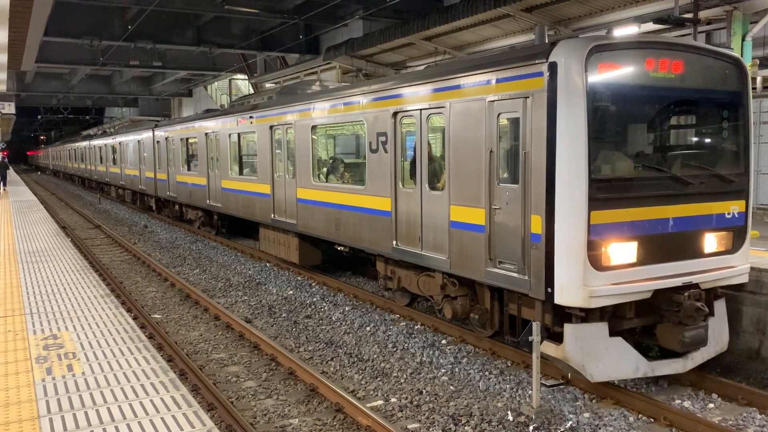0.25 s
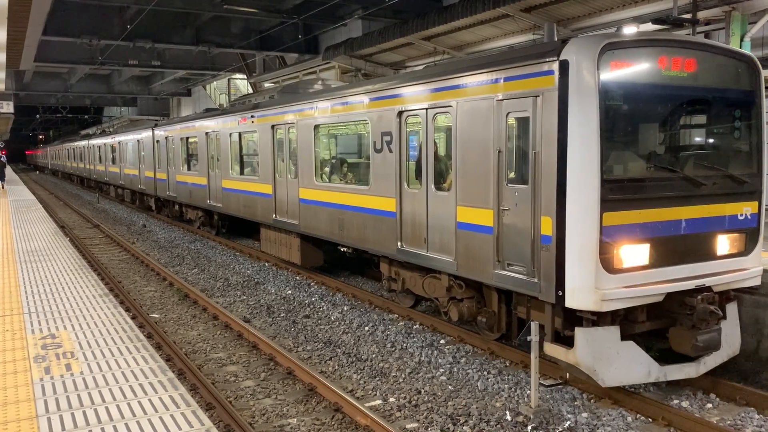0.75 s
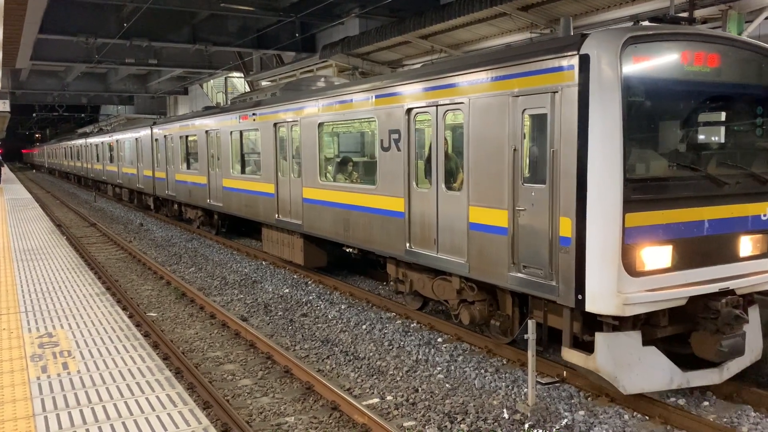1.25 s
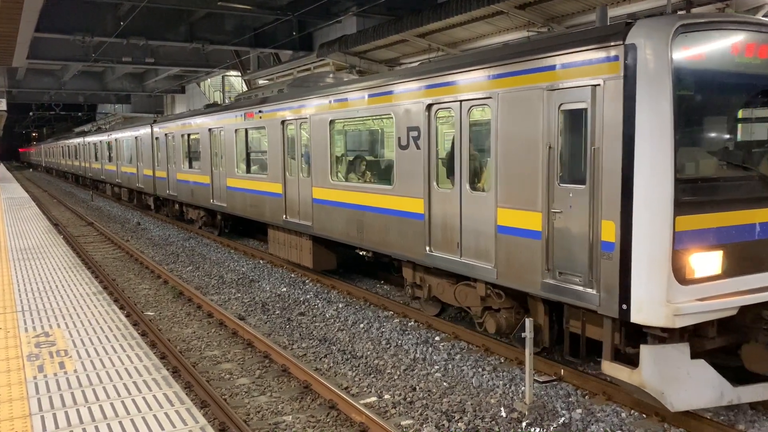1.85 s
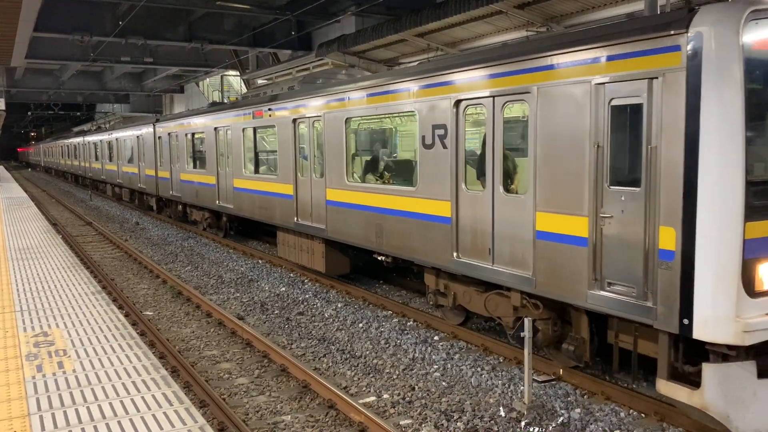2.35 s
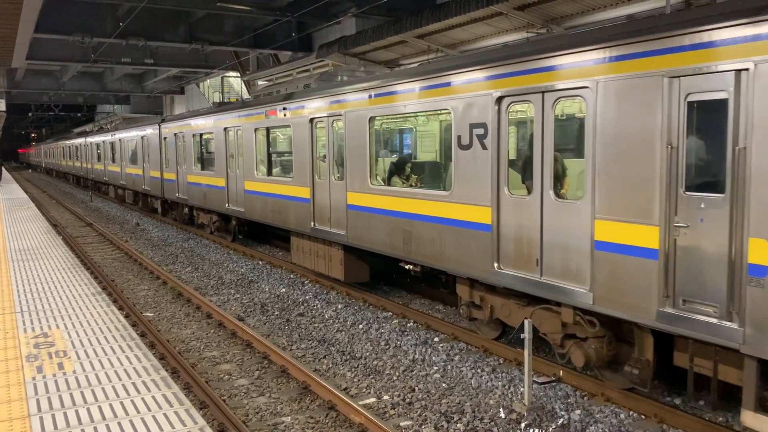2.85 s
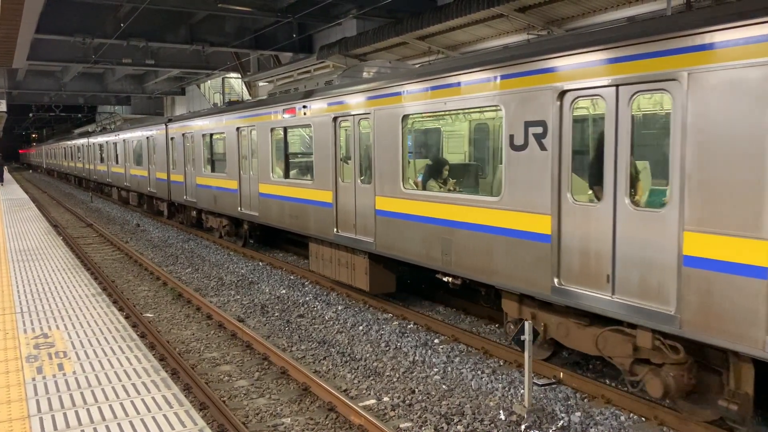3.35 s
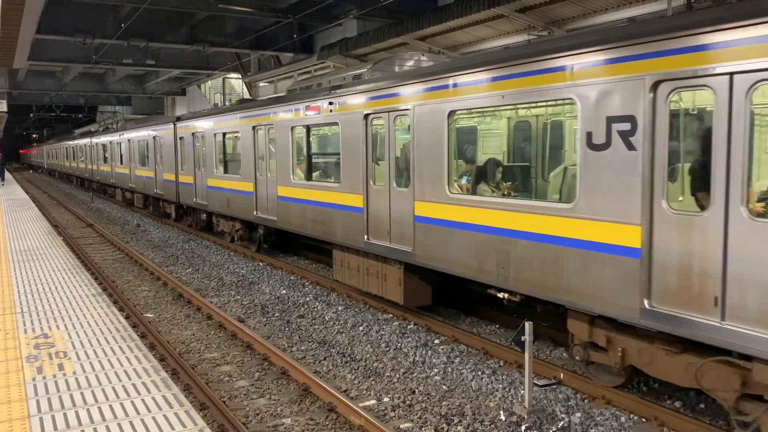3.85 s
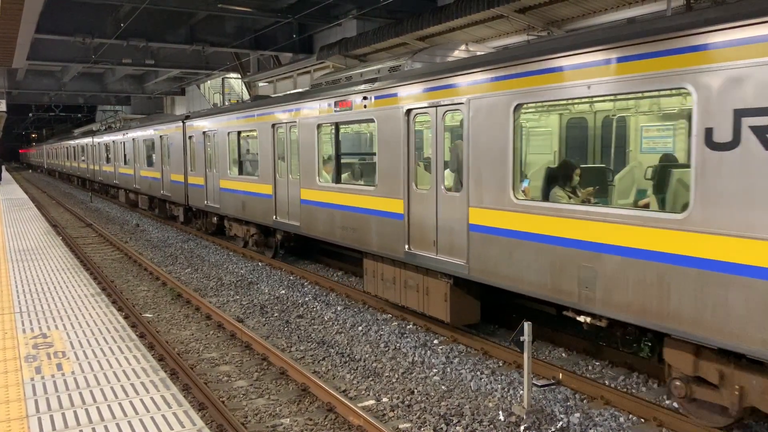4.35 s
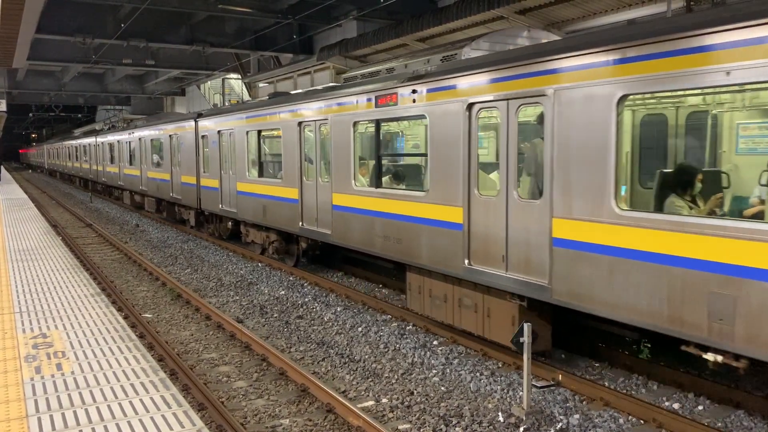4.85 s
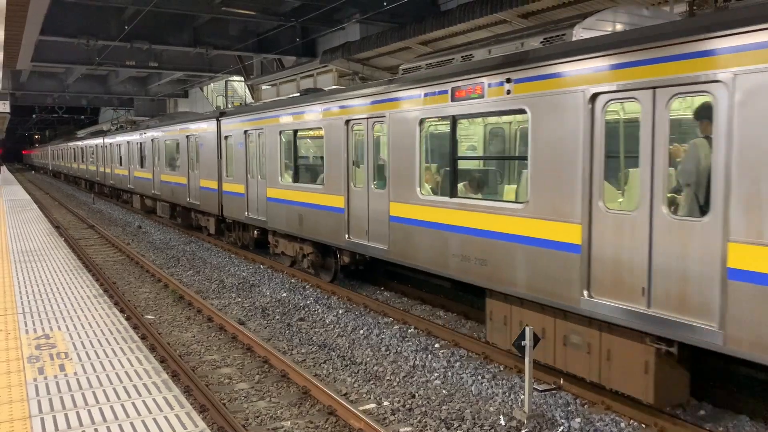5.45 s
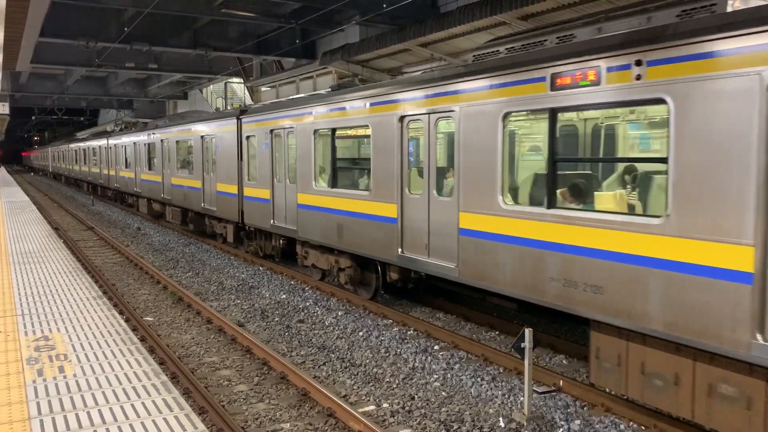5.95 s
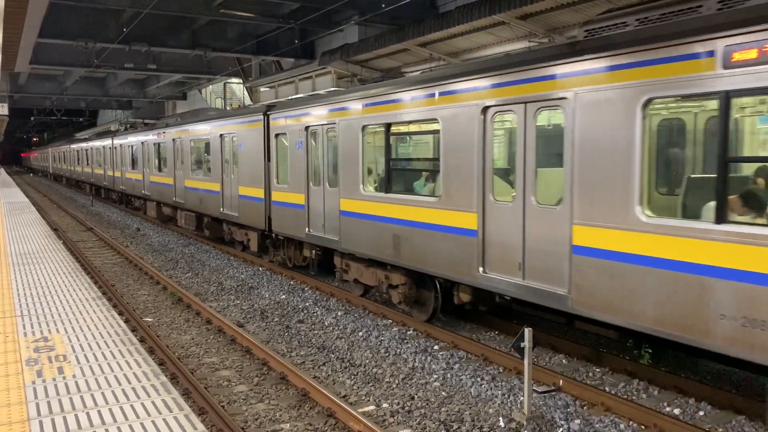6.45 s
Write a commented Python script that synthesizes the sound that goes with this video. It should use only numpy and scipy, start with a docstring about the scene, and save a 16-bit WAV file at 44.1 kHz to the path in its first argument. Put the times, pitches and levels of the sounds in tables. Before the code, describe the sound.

An electric train rolls out of a roofed station, humming and hissing with a wavering whistle that sags away, then rumbling, growling and clanking over rail joints.

```python
"""An electric commuter train pulls out, heard across the tracks by a phone on a roofed platform.
Wheels and rail ring as noise-driven resonances and clank at the joints as struck modes.
A valve hisses as flickering coloured noise, and whistles as a beating tone, then a sagging note.
Hum tones, a blower and a climbing motor growl sound under the floor; banded noise rumbles.
Each port adds echoes of its own."""
import sys
import numpy as np
from scipy import signal
from scipy.fft import rfft, irfft, next_fast_len
from scipy.io import wavfile
from scipy.ndimage import uniform_filter1d, map_coordinates

SR = 44100
rng = np.random.default_rng(int(sys.argv[2]) if len(sys.argv) > 2 else 0)


def digitize_waveform(pressure):
    """Quantize a signal to 16-bit integers and store it at the path in sys.argv[1].

    Rows of a 2-D input are taken as channels; values are limited to [-1, 1].
    """
    field = np.atleast_2d(pressure).T
    bounded = np.clip(field, -1, 1)
    quanta = np.round(bounded * 32767).astype(np.int16)
    wavfile.write(sys.argv[1], SR, quanta)


N = 295905
TIME_S = np.arange(N) / SR
SIZE = next_fast_len(N + 2 * SR, real=True)  # transform length, with room for echoes
AIR_FADE_DB_PER_S = 77  # hiss and steady whistle both die at this rate


def undb(db):
    """Turn decibels into gain."""
    return 10 ** (np.asarray(db) / 20)


def unit(x):
    """Scale to rms 1."""
    return x / np.sqrt(np.mean(x ** 2))


def curves(table):
    """Join table columns by straight lines over the time in the first column."""
    time_s, *columns = np.transpose(table)
    return [np.interp(TIME_S, time_s, column) for column in columns]


def walk(rate_hz):
    """Wander at random: levels held for 1 / rate, smoothed twice, rms 1."""
    hold = int(SR / rate_hz)
    steps = np.repeat(rng.standard_normal(N // hold + 1), hold)
    return unit(uniform_filter1d(uniform_filter1d(steps, hold), hold)[:N])


def swell_db(peak_s, peak_db, lasts_s):
    """Rise and fall once, 10 dB down at lasts_s either side of the peak."""
    return peak_db - 10 * ((TIME_S - peak_s) / lasts_s) ** 2


def tone(pitch_hz, level_db):
    """A sine that follows a pitch and an rms level, from a random starting phase."""
    phase = 2 * np.pi * np.cumsum(pitch_hz) / SR + rng.uniform(0, 2 * np.pi)
    return np.sqrt(2) * undb(level_db) * np.sin(phase)


def ring(x, pitch_hz, width_hz):
    """Two-pole resonance with gain 1 at its centre."""
    b, a = signal.iirpeak(min(pitch_hz, .45 * SR), pitch_hz / width_hz, fs=SR)
    return signal.lfilter(b, a, x)


def rough_ring(pitch_hz, width_hz):
    """Flickering noise through a steep resonance that strays in pitch, rms 1."""
    flicker_db = 2.97 * walk(14) + .7 * walk(2.41)
    rough = rng.standard_normal(N) * undb(flicker_db)
    pole_width_hz = 1.23 * width_hz  # two passes narrow the band
    steady = ring(ring(rough, pitch_hz, pole_width_hz), pitch_hz, pole_width_hz)
    stray = .004 * walk(20)  # share of the pitch
    read_at = np.arange(N) + np.cumsum(stray - stray.mean())
    return unit(map_coordinates(steady, [read_at], mode="mirror"))


def bands(colour, flicker_db, rate_hz):
    """Coloured noise as octave bands (centre Hz, sound), each flickering alone."""
    f = np.maximum(np.fft.rfftfreq(SIZE, 1 / SR), 1)
    pitch_hz, level_db = np.transpose(colour)
    shape_db = np.interp(np.log(f), np.log(pitch_hz), level_db, left=-90)
    noise = rfft(rng.standard_normal(SIZE)) * undb(shape_db)
    noise = noise / np.sqrt(np.mean(irfft(noise, SIZE) ** 2))
    out = []
    for centre_hz in 2. ** np.arange(4, 15):
        if centre_hz >= pitch_hz[0] / 2:
            overlap = np.clip(1 - abs(np.log2(f / centre_hz)), 0, 1)
            band = irfft(noise * overlap, SIZE)[:N]
            out.append((centre_hz, band * undb(flicker_db * walk(rate_hz))))
    return out


def rumble():
    """Broad noise of station, fans and car bodies; four ranges follow their own levels."""
    # course of the rumble: start_s [s], bass_db, deep_db, treble_db, top_db [dB]
    rumble_levels = [(0, -37, -35, -31.5, -31), (2.84, -36, -31.5, -31, -32), (3.6, -37, -33.5, -33, -35),
                     (4.4, -36, -27, -33.5, -33), (5.75, -34, -31, -31.5, -31.5),
                     (6.71, -33, -31.5, -29.5, -29.5)]
    # relative colour: pitch_hz [Hz], level_db [dB]
    rumble_colour = [(22, -38), (32, -27), (55, -3.5), (90, -4), (150, -5.5), (300, -9.5), (550, -18),
                     (1100, -24.5), (1900, -30.5), (2600, -34), (4500, -36), (6500, -42.5), (11000, -43),
                     (16000, -57.5)]
    bass_db, deep_db, treble_db, top_db = curves(rumble_levels)
    lumps_db = .2 * TIME_S  # the low end grows lumpier with speed
    bass_db = bass_db + lumps_db * walk(10)
    deep_db = deep_db + lumps_db * walk(10)
    out = np.zeros(N)
    for centre_hz, band in bands(rumble_colour, flicker_db=2.18, rate_hz=6.5):
        if centre_hz < 100:
            level_db = deep_db
        elif centre_hz < 700:
            level_db = bass_db
        else:
            level_db = treble_db if centre_hz < 6000 else top_db
        out += band * undb(level_db)
    return out


def blower():
    """A blower hisses in close resonant bands at constant mean level."""
    # blower bands: pitch_hz [Hz], width_hz [Hz], level_db [dB]
    fan_rings = [(4994, 59, -58.5), (5160, 77, -58.5), (5304, 106, -56)]
    return sum(undb(level_db) * rough_ring(pitch_hz, width_hz)
               for pitch_hz, width_hz, level_db in fan_rings)


def underfloor_hum():
    """A clean main hum over weaker tones of narrow resonant noise, and one low rough swell."""
    # main hum: start_s [s], level_db [dB]
    hum_levels = [(0, -35), (1.58, -35), (1.7, -48), (2.1, -44), (2.58, -35), (2.72, -42), (3.1, -54),
                  (3.8, -41), (4.55, -41), (4.8, -34.5), (5.05, -39), (5.22, -64), (5.6, -32), (6.2, -40),
                  (6.71, -42)]
    # weaker tones: pitch_hz [Hz], width_hz [Hz], level_db at the start [dB], drift [dB per s]
    hum_tones = [(53.8, 2.1, -47, -0.0073), (173, 9.1, -48, 0.075), (236.5, 4.6, -46, -0.85),
                 (292.9, 10, -47.5, -0.074), (355.2, 5.6, -51.5, -0.29), (407.6, 6.4, -56, -1.9)]
    # pitch loosens and level grows lumpier with speed
    pitch_hz = 112.2 + .22 * TIME_S * walk(6)
    out = tone(pitch_hz, curves(hum_levels)[0] + .26 * TIME_S * walk(10))
    for side_hz, width_hz, level_db, drift in hum_tones:
        side_tone = unit(ring(rng.standard_normal(N), side_hz, width_hz))
        out += undb(level_db + drift * TIME_S) * side_tone
    low_tone = unit(ring(rng.standard_normal(N), 166.6, 14))
    return out + undb(swell_db(peak_s=4.27, peak_db=-40.5, lasts_s=.45)) * low_tone


def motor():
    """Traction motor growl whose pitch climbs with speed; its second order swells first."""
    # growl: start_s [s], level_db before its waver [dB]
    motor_levels = [(3.8, -68), (4.2, -47), (4.45, -48), (4.75, -41), (5.2, -39.5), (5.64, -31.5),
                    (5.8, -40), (6.24, -58), (6.44, -30), (6.71, -42)]
    since_s = TIME_S - 2.5
    pitch_hz = 35 + 17.5 * since_s - .45 * since_s ** 2  # the climb eases off
    growl = tone(pitch_hz, curves(motor_levels)[0] + 2.1 * walk(9))
    return growl + tone(2 * pitch_hz, swell_db(peak_s=3.4, peak_db=-39, lasts_s=.24))


def valve():
    """Hiss of escaping air, its level drifting slightly until the valve shuts and it dies."""
    # relative colour of the air: pitch_hz [Hz], level_db [dB]
    air_colour = [(500, -9), (1000, 4.5), (2200, -1), (4200, -15), (6500, -14.5), (11000, -15),
                  (13000, -15), (16000, -36)]
    shut_s = 2.94
    fade_db = AIR_FADE_DB_PER_S * np.maximum(TIME_S - shut_s, 0)
    level_db = -46 - .2 * TIME_S - fade_db
    return undb(level_db) * sum(band for _, band in bands(air_colour, flicker_db=2, rate_hz=8.86))


def steady_whistle():
    """The valve's whistle beats as two paths cancel, sways between the ports, and briefly outlasts the hiss."""
    # beats, broadly quicker as the train gathers speed: cancel_s [s], following peak_s [s],
    # level_db before flicker and path gain [dB], left minus right pan_db [dB]
    whistle_beats = [(-.6, .1, -34.5, -4.5), (0.825, 1.04, -34.5, 2), (1.173, 1.244, -35.5, -2),
                     (1.5, 1.603, -40.5, -6), (1.685, 1.78, -37, -5), (1.884, 1.97, -51, -10),
                     (2.0, 2.098, -37.5, 5.5), (2.225, 2.23, -45.5, -4), (2.303, 2.395, -35, -2),
                     (2.46, 2.55, -39.5, -4), (2.712, 2.795, -44, -4), (2.863, 2.95, -43, -3),
                     (3.04, 3.095, -47, 0), (3.137, 3.22, -52.5, -2)]
    whistle_hz, end_s = 1222.4, 3.25  # lingers a little after the valve shuts
    cancel_s, peak_s, level_db, pan_db = np.transpose(whistle_beats)
    # the paths slip half a turn between each cancelling and the next peak
    marks_s = np.r_[np.ravel([cancel_s, peak_s], order="F"), end_s]
    turns = np.interp(TIME_S, marks_s, np.arange(len(marks_s)) / 2)
    share = np.minimum(.3 + .15 * TIME_S, 1)  # the second path grows against the first
    path_gain = abs(1 - share * np.exp(2j * np.pi * turns)) / (1 + share)
    beat = np.searchsorted(cancel_s, TIME_S) - 1
    blend = int(.04 * SR)  # 40 ms, smooths the step from beat to beat
    level_db = uniform_filter1d(level_db[beat], blend)
    pan_db = uniform_filter1d(pan_db[beat], blend)
    fade_db = AIR_FADE_DB_PER_S * np.maximum(TIME_S - end_s, 0)
    note = tone(np.full(N, whistle_hz), level_db + 1.1 * walk(24.85) - fade_db)
    return path_gain * note * undb([pan_db / 2, -pan_db / 2])


def sagging_whistle():
    """A broken, falling note marks the valve shutting; far walls return it."""
    # the note itself, then its returns: delay_s [s], level_db against the note [dB]
    sag_echoes = [(0, 0), (.065, -6), (.115, -7), (.16, -10), (.21, -12)]
    loudest_s, loudest_hz, fall_hz_per_s = 3.03, 1088, 1050
    rise_db_per_s, fade_db_per_s = 120, 220
    out = np.zeros(N)
    for delay_s, echo_db in sag_echoes:
        late_s = np.clip(TIME_S - loudest_s - delay_s, -.5, .5)
        course_db = np.minimum(rise_db_per_s * late_s, -fade_db_per_s * late_s)
        level_db = -40 + echo_db + course_db + 1.8 * walk(40)
        pitch_hz = loudest_hz - fall_hz_per_s * late_s + 12 * walk(30)
        out += tone(pitch_hz, level_db)
    return out


def rolling():
    """Rough rail and tread shake wheel and rail modes, which ring as noisy resonances."""
    # levels of the three groups: start_s [s], low_db, middle_db, high_db [dB]
    roll_levels = [(0, -51.5, -60, -61), (1.66, -56, -73, -54), (2.8, -49, -71, -51.5),
                   (3.5, -47, -62, -50.5), (4.3, -48.5, -57, -49.5), (5, -46, -55, -48),
                   (6.71, -39.5, -47, -49)]
    # low modes: pitch_hz [Hz], width_hz [Hz], relative level_db [dB]
    low_rings = [(800, 114, -7.5), (1324, 45, -4.5), (1519, 107, 0)]
    # middle modes: pitch_hz [Hz], width_hz [Hz], relative level_db [dB]
    middle_rings = [(2135, 190, 1.5), (2306, 80, -4)]
    # high modes: pitch_hz [Hz], width_hz [Hz], relative level_db [dB]
    high_rings = [(2855, 130, -1.5), (3027, 136, 4.5), (3560, 810, -3.5)]
    out = np.zeros(N)
    for group_db, rings in zip(curves(roll_levels), (low_rings, middle_rings, high_rings)):
        for pitch_hz, width_hz, mode_db in rings:
            out += undb(group_db + mode_db) * rough_ring(pitch_hz, width_hz)
    return out


def clanks():
    """Each rail joint gives a blow and a shudder that ring the wheel's modes and splash treble."""
    # wheels over joints: start_s [s], overall level_db [dB], then relative low_db (modes under 3 kHz),
    # middle_db (3-5 kHz), treble_db (over 6.5 kHz, and the splash) [dB], shudder_s [s]
    joint_blows = [(3.188, -47, -11, 8.5, -11, .03), (3.936, -47, -2, 0, -5, .05),
                   (4.348, -49, -6, 1, -10, .07), (5.72, -33.5, -16, 1.5, -0.5, .1),
                   (6.492, -34, -2, -4, 0.5, .07), (6.545, -42, -10, -2, 2, .07)]
    # wheel modes: pitch_hz [Hz], relative peak level_db [dB], t60_s [s]
    clank_modes = [(1538, 8, 0.05), (2425, 4, 0.08), (4036, 0, 0.11), (4170, -9, 0.05), (5950, -3, 0.07),
                   (6907, -16, 0.05), (7370, -14.5, .04), (10300, -17, .03), (11350, -17, .04),
                   (13800, -12, 0.07)]
    out, t = np.zeros(N), np.arange(SR // 2) / SR
    for start_s, level_db, low_db, middle_db, treble_db, shudder_s in joint_blows:
        # the rail end chatters in broken bursts that outlast the blow
        chatter_db = -16 + 4 * walk(90)[:len(t)]
        shudder = undb(chatter_db) * np.exp(-(t / shudder_s) ** 2)
        rough = rng.standard_normal(len(t)) * np.minimum(t / .007, 1)  # 7 ms rise
        rattle = rough * (np.exp(-t / .02) + shudder)
        strike = rough * (np.exp(-t / .005) + shudder / 2)  # a shorter push rings the modes clean
        body = undb(treble_db - 3) * ring(rattle, 7800, 8300)  # broad treble splash
        for pitch_hz, mode_db, t60_s in clank_modes:
            if pitch_hz < 3000:
                tilt_db = low_db
            elif pitch_hz < 5000:
                tilt_db = middle_db
            else:
                tilt_db = treble_db if pitch_hz > 6500 else 0
            mode = ring(strike, pitch_hz, np.log(1000) / (np.pi * t60_s))
            body = body + undb(mode_db + tilt_db) * mode / abs(mode).max()
        i = int(start_s * SR)
        out[i:i + len(t)] += (undb(level_db) * body)[:N - i]
    return out


def echoes(t60_s):
    """Spectra of two unrelated trains of decaying noise echoes, 1 s long, power 1."""
    t = np.arange(SR) / SR
    decay = np.exp(-np.log(1000) * t / t60_s)
    tail = rng.standard_normal((2, SR)) * decay * np.minimum(t / .0076, 1)
    return rfft(tail / np.sqrt(np.sum(tail ** 2, axis=1, keepdims=True)), SIZE)


def scene():
    """Direct sound meets the ports out of phase; each port hears its own roof and platform echoes."""
    # the phone's two ports: pitch_hz [Hz], direct share [0-1], right leads by lead [rad],
    # left minus right pan_db [dB]
    middle_ports = [(182, 1, -1, -3.5), (320, 0.65, 0.96, -1.5), (590, 0.46, -2.5, 5), (907, 0.24, 2, 3),
                    (1280, 0.65, -1.5, 0.5), (2130, 0.89, -2, 0), (2480, 0.25, -1, -0.5),
                    (3030, 0.65, -2.5, 0.5), (3620, 0.07, -6, 0.5), (4920, 0.98, -4.5, -3),
                    (5340, 0.56, -4.5, -1), (6340, 0.96, -5.5, -5), (7520, 0.25, -8.5, -0.5),
                    (8030, 1, -11, 1), (9270, 1, -8, -0.5), (9380, 0.93, -8, -1.5), (11900, 1, -3, 2),
                    (13000, 0.9, -1, -1), (13600, 1, 0.5, 0)]
    # the bass, nearly alike at both ports: pitch_hz [Hz], share [0-1], lead [rad], pan_db [dB]
    bass_ports = [(0, 1, 0, 0), (60, .985, 0, 0), (110, .985, 0, -.2)]
    # the top, in opposite phase: pitch_hz [Hz], share [0-1], lead [rad], pan_db [dB]
    top_ports = [(14800, .97, np.pi, 0), (22050, .97, np.pi, 0)]
    pitch_hz, *columns = np.transpose(bass_ports + middle_ports + top_ports)
    f = np.fft.rfftfreq(SIZE, 1 / SR)
    share, lead, pan_db = (np.interp(f, pitch_hz, column) for column in columns)
    share = np.clip(share, 0, 1)
    side = np.array([[-.5], [.5]])  # left, right
    direct = np.exp(1j * lead * side)
    lean = undb(-side * pan_db)

    # steady noise comes from the whole length of the train: long, colourless scatter
    spread = echoes(t60_s=1.6)
    spread = spread / abs(spread)
    train_path = np.sqrt(share) * direct + np.sqrt(1 - share) * spread
    clank_path = direct + undb(-6) * np.sqrt(1 - share) * echoes(t60_s=.3)
    whistle_path = direct + undb(-15) * spread

    train = rumble() + blower() + underfloor_hum() + motor() + valve() + rolling()
    whistle = steady_whistle() + sagging_whistle()
    hold = SR  # a mirrored second ahead fills the hall before the start
    heard = 0
    for x, path in ((train, train_path), (whistle, whistle_path), (clanks(), clank_path)):
        filled = np.concatenate([x[..., hold:0:-1], x], axis=-1)
        heard = heard + rfft(filled, SIZE) * path
    return irfft(heard * lean, SIZE)[:, hold:hold + N]


def record(dry):
    """The phone cuts the top with a steep low-pass."""
    top_hz = 15714
    return signal.sosfilt(signal.ellip(12, .2, 80, top_hz, fs=SR, output="sos"), dry)


dry = scene()
out = record(dry)
digitize_waveform(out)
```